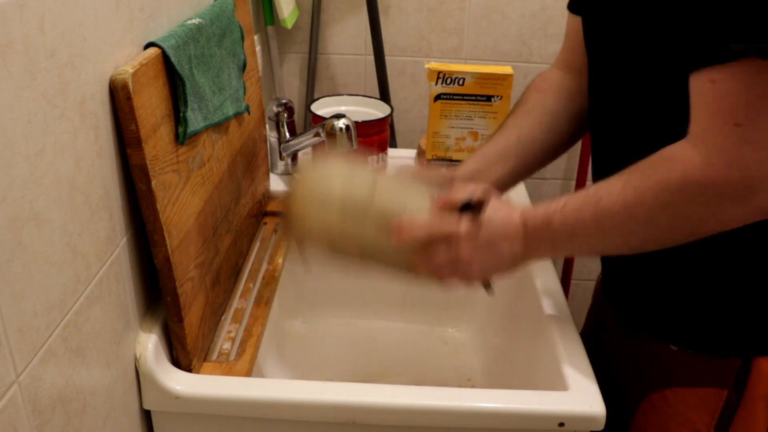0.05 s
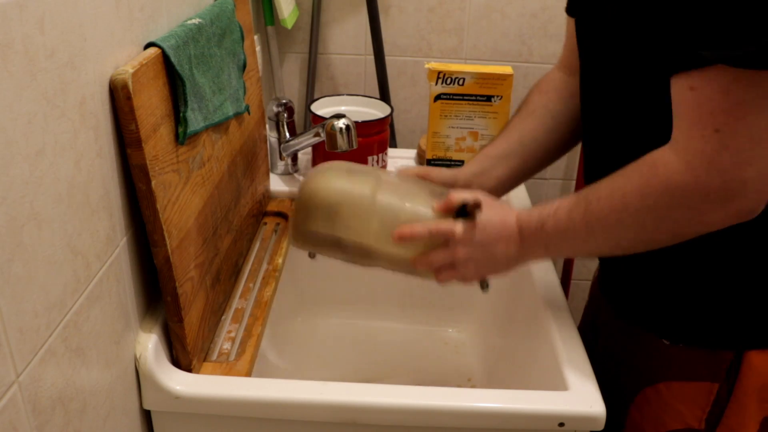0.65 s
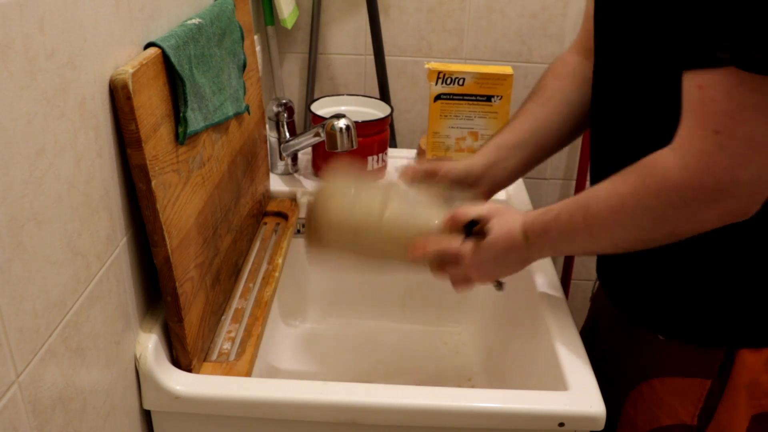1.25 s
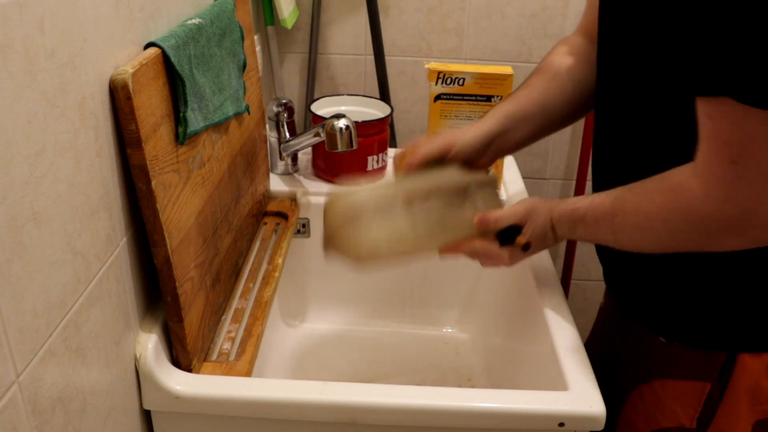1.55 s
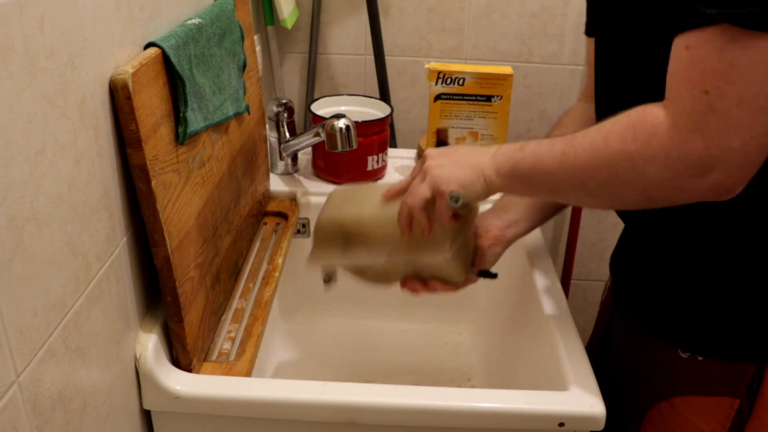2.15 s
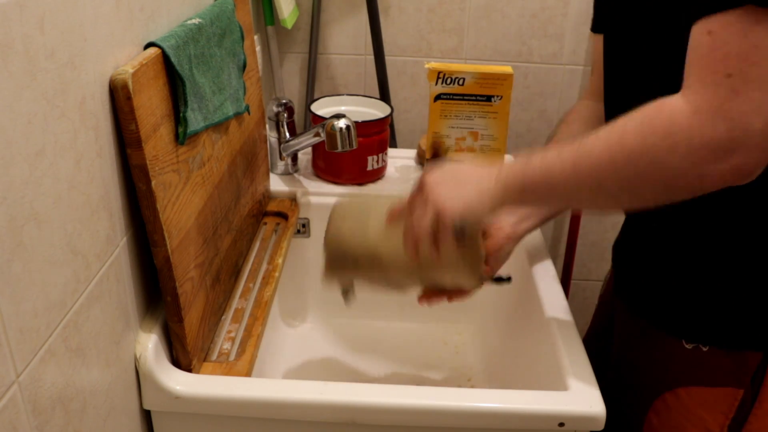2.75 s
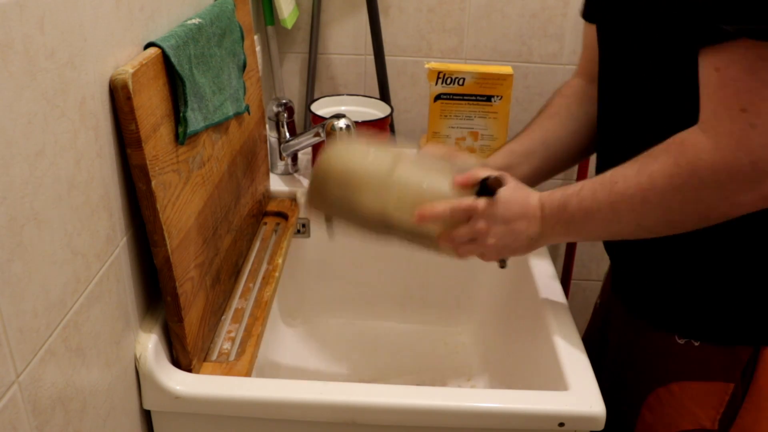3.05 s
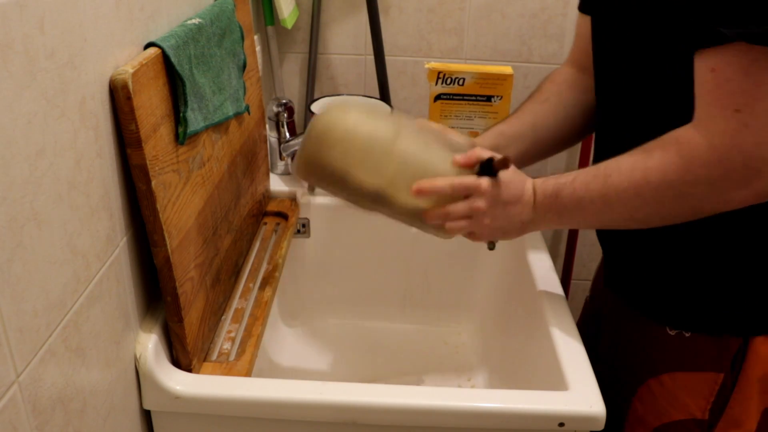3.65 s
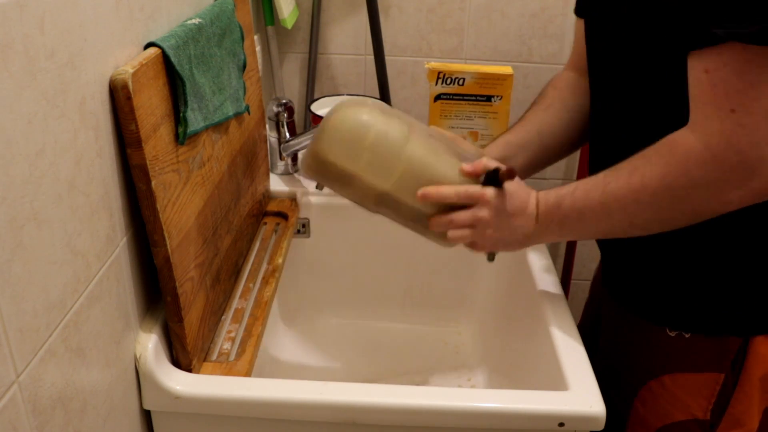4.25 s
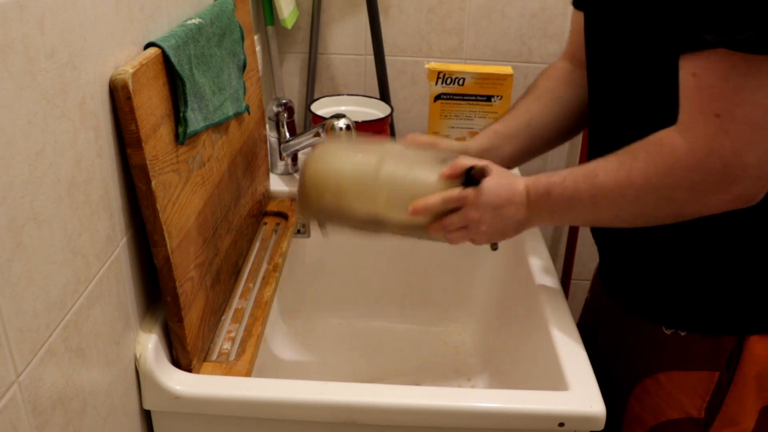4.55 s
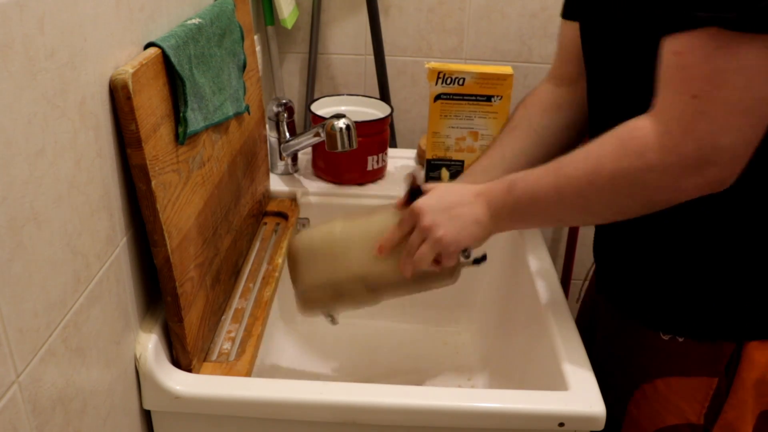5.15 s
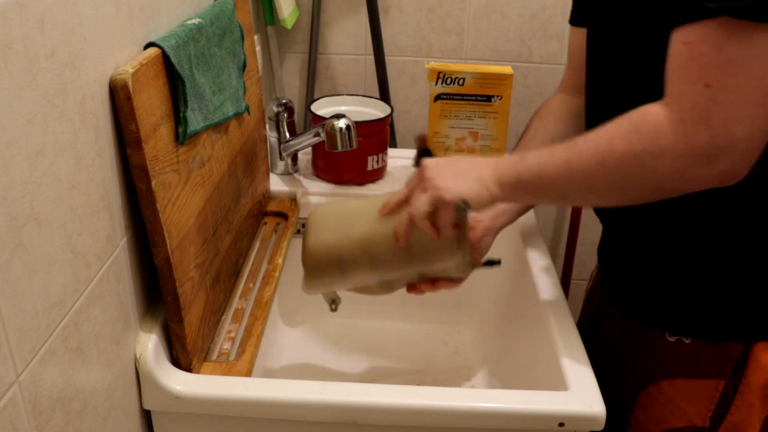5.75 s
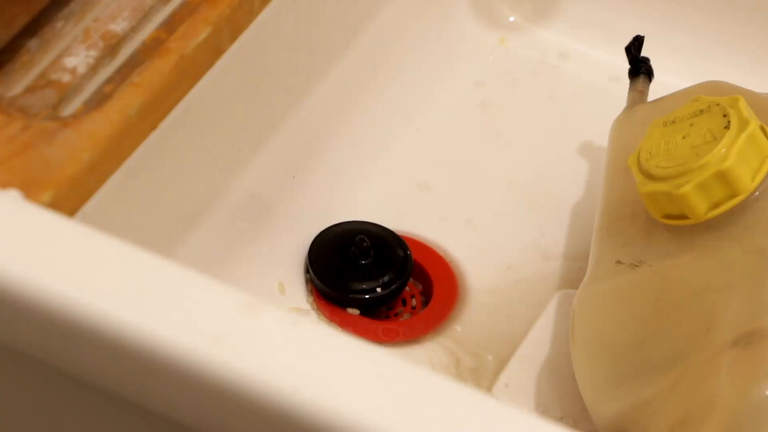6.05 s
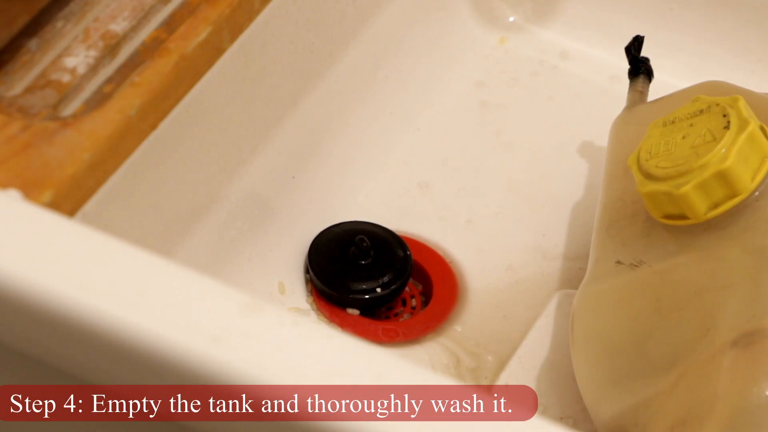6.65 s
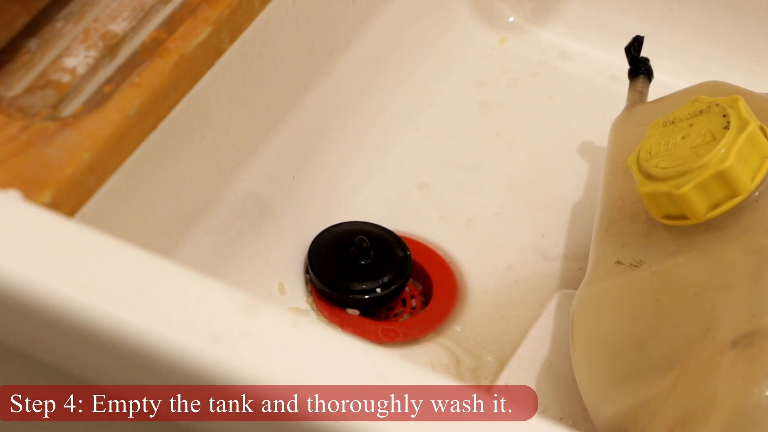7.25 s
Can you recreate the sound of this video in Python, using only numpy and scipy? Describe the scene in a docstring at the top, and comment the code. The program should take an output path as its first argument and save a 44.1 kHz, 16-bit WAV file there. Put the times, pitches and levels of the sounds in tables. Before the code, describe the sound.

Heard up close in a small tiled washroom, grains rattle back and forth inside a hand-shaken plastic tank, about twelve strokes a second, each a sharp hit with a bright, gritty spray. Occasional hollow knocks come from the hands. The rattle softens briefly midway, picks up again, and ends with a cluster of knocks and a tiny squeak. A sudden cut leaves low room tone, a few soft bumps, faint rustles and one tick.

```python
"""Loose grains are shaken in a plastic tank over a sink, twelve strokes a second, hitting each end in turn.
Every landing is a short slam, then a spray of tiny impacts that rings the walls. Hands knock on the plastic
along the way and squeak once near the last strokes. At six seconds the scene changes to quiet washroom tone
with soft handling bumps, a low rumble, rustles and one faint tick."""
import sys
import numpy as np
from scipy import signal
from scipy.fft import rfft, irfft
from scipy.io import wavfile
from scipy.ndimage import uniform_filter1d

SR = 44100
rng = np.random.default_rng(int(sys.argv[2]) if len(sys.argv) > 2 else 0)


def waveform_to_disk(signal):
    """Save audio, clipped to [-1, 1], as 16-bit WAV at the path in sys.argv[1]."""
    frames = np.transpose(np.atleast_2d(signal))
    scaled = np.clip(frames, -1, 1) * 32767
    samples = np.round(scaled).astype(np.int16)
    wavfile.write(sys.argv[1], SR, samples)


N = 330750

# EQ curves of the room tone and the handling noises: (frequency [Hz], relative level [dB])
ROOM_EQ = [(30, -16), (70, -18.5), (170, -9), (320, 1), (450, -2.5), (620, -5), (790, -8.5), (1200, -12),
           (3000, -20.5)]
RUMBLE_EQ = [(25, -21), (50, -18), (72, 5), (90, -10), (140, 2.5), (400, -35.5)]
RUB_EQ = [(200, -26), (600, 2), (1200, 0), (2200, 0), (3500, -4), (5500, -16), (16000, -33)]
HISS_EQ = [(200, -47), (1500, -8), (4500, -3), (7000, 1.5), (10000, -0.5), (15500, -10.5)]
# faint note in the room tone: (frequency [Hz], width [Hz], boost [dB])
ROOM_RINGS = [(970, 74, 10.5)]
# low swells under the handling: (peak time [s], length [s], level [dB])
RUMBLES = [(6.17, 0.33, -64), (6.6, 0.27, -52.5)]
# faint rustles: (peak time [s], length [s], dull rub [dB], bright hiss [dB])
RUSTLES = [(6.085, 0.023, -66, -56.5), (6.53, .2, -58.5, -65), (7.05, 0.091, -58, -68),
           (7.16, .07, -61.5, -60), (7.38, 0.13, -57.5, -55)]
# soft bumps, a light touch, hands on the tank: (time [s], level [dB], centre [Hz], spread [octaves])
BUMPS = [(6.076, -44, 173, .75), (6.168, -57, 220, .69), (6.215, -50, 246, 0.42), (6.405, -38.5, 202, .5),
         (6.428, -40.5, 270, .9), (6.446, -34, 280, 1), (6.461, -44, 230, 1.2)]
TICKS = [(7.039, -58.5, 2110, 1.0)]
KNOCKS = [(.689, -27, 1170, 0.33), (.706, -47, 167, 0.58), (.965, -34.5, 893, .1),
          (1.085, -35.5, 525, 0.64), (1.103, -36.5, 1200, 0.61), (1.472, -40.5, 536, 0.31),
          (1.589, -38, 396, 1.4), (1.76, -48.5, 150, 0.85), (1.781, -50, 380, .96),
          (1.946, -43.5, 400, 1.3), (3.297, -41, 1040, 0.042), (4.15, -48.5, 310, .7),
          (4.293, -36.5, 495, 1.35), (4.962, -37, 464, 0.78), (5.006, -36, 550, 0.71),
          (5.736, -33, 423, 0.37), (5.749, -31.5, 1610, 0.18), (5.753, -34.5, 265, 0.89),
          (5.797, -33.5, 352, 0.42), (5.807, -26, 453, 1.13), (5.829, -32, 328, 0.68),
          (5.911, -16.5, 1150, 1.62), (5.922, -21.5, 1130, 1.05), (5.928, -28.5, 320, 0.49)]
# body of the bumps and of the struck tank: (frequency [Hz], relative level [dB], t60 [s])
BUMP_MODES = [(76, -16, 0.26), (104, -22, .1), (135, -5, 0.16), (186.7, 0.5, 0.17), (208, -6, 0.11),
              (258, -4.5, 0.17), (310, -7.5, 0.35), (368, -3, .1), (460, -6.5, 0.34), (520, -5, 0.14)]
TANK_MODES = [(135, -19, 0.063), (186, -8, 0.048), (236, -15.5, 0.18), (317.7, -7, 0.27), (350, 3.5, 0.097),
              (400, -2, 0.15), (455, 8, 0.048), (637, -1.5, 0.11), (820, 11, 0.037), (909, 1, 0.2),
              (1056, -2, 0.22), (1120, -3, 0.29), (1244, 22.5, 0.031), (1418, -3, 0.18), (1660, -10, 0.038),
              (1820, -2, 0.11), (2130, 8.5, 0.059), (2640, 5, 0.048), (3200, 1, 0.031)]
# harmonics of the squeak, fundamental first: (relative level [dB])
SQUEAK_HARMONICS = [3, -1, -8, -27]

# EQ curves of the slam, the spray and the ringing walls: (frequency [Hz], relative level [dB])
SLAM_EQ = [(400, -23), (1500, -12), (3700, -17), (5200, 0), (8000, 0), (12000, -2.5), (15500, 1.5)]
SPRAY_EQ = [(300, -40.5), (800, -9.5), (1600, -9), (2300, -2), (3800, -2), (5500, 1), (7500, 1),
            (11000, -1.5), (15500, -5.5)]
WALL_EQ = [(60, -26), (150, -56), (300, -9.5), (500, -9), (700, 1.5), (1000, -4), (1300, -3), (1650, -27),
           (3000, -19), (8000, -37)]
# extra EQ for the softer, duller near end: (frequency [Hz], relative level [dB])
NEAR_END_EQ = [(1500, 4), (3500, 7), (5300, 3.5), (6800, 1), (10000, 1.5)]
# narrow tank resonances and notches in the spray and walls: (frequency [Hz], width [Hz], gain [dB])
SPRAY_RINGS = [(1902, 36, 6.5), (2440, 40, -1.5), (3030, 70, 6.5), (3300, 130, 0), (4520, 31, -1),
               (4670, 30, 6), (6440, 49, 2.5)]
WALL_RINGS = [(477, 31, 8.5), (698, 130, 3), (790, 14, -18), (926, 43, 10.5), (1049, 42, 14),
              (1270, 20, 10), (1480, 12, -5)]
# tempo of the shaking, even between points: (time [s], strokes done [count])
PACE = [(.009, 0), (.093, 1), (.368, 4), (.444, 5), (.713, 8), (1.376, 16), (1.636, 19), (2.461, 29),
        (3.293, 39), (3.81, 45), (4.235, 50), (4.47, 53), (4.541, 54), (5.184, 62), (5.778, 69),
        (5.966, 71)]
# how hard the arms shake: (time [s], effort [dB])
EFFORT = [(0, -2.5), (.17, 1), (.3, -1.5), (.7, 0.5), (.95, 1.5), (1.45, 0.5), (1.75, -1), (2.05, -0.5),
          (2.2, -3), (2.55, -4), (2.84, -5.5), (3.0, 0.45), (3.7, -0.5), (4.5, .7), (4.7, -0.5), (4.9, .5),
          (5.5, -1), (5.9, -4.5)]
# tank's aim along the stroke, 0 is head on; turned aside, grains slide more: (time [s], aim [dB])
AIM = [(0, -6), (1.1, -1.5), (1.9, -5), (2.35, -12), (2.7, -9.5), (2.86, -2), (3.05, -1.5), (3.5, -2.5),
       (4.15, 0), (4.4, -1), (5.55, -1.5), (5.9, -7.5)]
# extra-hard slam accents, including a sharp click at the very start: (time [s], extra slam [dB])
SLAM_ACCENTS = [(.009, 8), (.186, 9), (.444, 4), (1.636, 5.5), (1.967, 6.5), (3.046, 4.5), (3.128, 3),
                (3.211, 5), (3.978, 2), (4.151, 3), (4.393, 3.5), (4.622, 3.5), (4.865, 2), (5.185, 5),
                (5.608, 7.5)]

# landing mix at normal effort, head on, and what moves it: (slam, spray, wall ring)
FAR_LANDING_DB, NEAR_LANDING_DB = (-24.5, -27.5, -42), (-28, -32.5, -45)
PER_EFFORT, PER_AIM = (1, 0.92, 1.5), (1, 0, .2)  # dB per dB
LANDING_SCATTER_DB = (1.98, 0.76, 1.75)
CUT_S = 6.023


def undb(db):
    """Decibels to gain."""
    return 10 ** (np.asarray(db) / 20)


def unit(x):
    """Scale to an rms of 1."""
    return x / np.sqrt(np.mean(x ** 2))


def at(curve, times):
    """Read an automation curve at the given times."""
    return np.interp(times, *np.transpose(curve))


def add(track, time_s, sound):
    """Mix a sound into a track at a time."""
    start = max(int(time_s * SR), 0)
    track[start:start + len(sound)] += sound[:max(N - start, 0)]


def high_pass(x, hz):
    """Thin the lows: small bodies radiate little below their own range."""
    return signal.sosfilt(signal.butter(3, hz, "high", fs=SR, output="sos"), x)


def colour(x, eq, rings=(), size=8192):
    """Minimum-phase EQ of unit power: a broad curve with narrow resonances on top."""
    f = np.maximum(np.arange(size // 2 + 1) * SR / size, 1)
    hz, db = np.array(eq, float).T
    db = np.interp(np.log(f), np.log(hz), db)
    for centre, width, peak_db in rings:
        db = db + peak_db / (1 + (2 * (f - centre) / width) ** 2)
    cepstrum = irfft(np.log(undb(db)))
    cepstrum[1:size // 2] *= 2  # fold forward, so nothing rings ahead of a hit
    cepstrum[size // 2 + 1:] = 0
    response = irfft(np.exp(rfft(cepstrum)))
    return signal.fftconvolve(x, response / np.linalg.norm(response))[:N]


def swells(rows, column, rest_db):
    """Power envelope of bell-shaped swells over a steady floor."""
    t = np.arange(N) / SR
    bells = (undb(2 * row[column]) * np.exp(-(2 * (t - row[0]) / row[1]) ** 2) for row in rows)
    return undb(2 * rest_db) + sum(bells)


def bursts(times, levels_db, rise, hold, t60):
    """Power envelope of hits, each with an attack, hold and decay in seconds."""
    t = np.arange(SR // 3) / SR
    shape = (1 - np.exp(-t / rise)) * undb(-60 * np.maximum(t - hold, 0) / t60)
    power = np.zeros(N)
    for time_s, db in zip(times, levels_db):
        add(power, time_s, (undb(db) * shape) ** 2)
    return power


def impacts(power, per_s, scatter_db):
    """A crackle of tiny hits; more power makes them both denser and harder."""
    chance = np.clip(per_s / SR * np.sqrt(power / power.mean()), 1e-4, 1)
    sizes = unit(rng.choice([-1, 1], N) * undb(scatter_db * np.clip(rng.standard_normal(N), -2, 2)))
    return (rng.random(N) < chance) * sizes * np.sqrt(power / chance)


def strikes(rows, modes, contact_s, scuff_db, scuff_t60):
    """Blows on one body; each contact spot favours the modes round one pitch and scuffs in that range."""
    t = np.arange(SR // 2) / SR
    f = np.maximum(np.fft.rfftfreq(len(t), 1 / SR), 1)
    hz, mode_db, t60 = np.array(modes, float).T[:, :, None]
    track = np.zeros(N)
    for time_s, db, centre, spread in rows:
        def favour(at_hz):
            return 1 / (1 + (np.log2(at_hz / centre) / spread) ** 4)
        detune, phase = rng.standard_normal((2, len(hz), 1))
        partials = np.sin(2 * np.pi * (hz * (1 + 0.011 * detune) * t + phase))
        ring = np.sum(favour(hz) * undb(mode_db - 60 * t / t60) * partials, axis=0)
        ring /= np.sqrt(np.mean(ring[:SR // 100] ** 2))
        noise = unit(irfft(rfft(rng.standard_normal(len(t))) * favour(f) / np.sqrt(f)))
        scuff = noise * undb(scuff_db - 60 * t / scuff_t60)
        add(track, time_s, undb(db) * (ring + scuff) * (1 - np.exp(-t / contact_s)))
    return track


def room_tone():
    """The washroom's bed: dark, steady noise that sings faintly."""
    return colour(rng.standard_normal(N), ROOM_EQ, ROOM_RINGS)


def tile_reverb(x, t60, wet_db, predelay_s):
    """Blend in a dense tail of reflections from the sink and tiles."""
    t = np.arange(SR // 2) / SR
    tail = rng.standard_normal(len(t)) * undb(-60 * t / t60) * (t > predelay_s)
    wet = signal.fftconvolve(x, tail / np.linalg.norm(tail))[:N]
    return (x + undb(wet_db) * wet) / np.sqrt(1 + undb(2 * wet_db))


def handling():
    """Quiet foley: soft bumps, a low rumble, the fine friction of rustles and the tick of a touch."""
    bumps = strikes(BUMPS, BUMP_MODES, contact_s=0.00091, scuff_db=-21, scuff_t60=0.075)
    rumble_power = swells(RUMBLES, column=2, rest_db=-71.5)
    rumble = colour(rng.standard_normal(N), RUMBLE_EQ) * np.sqrt(rumble_power)
    rub = impacts(swells(RUSTLES, column=2, rest_db=-63), per_s=4000, scatter_db=2)
    hiss = impacts(swells(RUSTLES, column=3, rest_db=-67), per_s=22000, scatter_db=6)
    tick = strikes(TICKS, TANK_MODES, contact_s=.0004, scuff_db=9, scuff_t60=0.059)
    return bumps + rumble + colour(rub, RUB_EQ) + colour(hiss, HISS_EQ) + tick


def hand_knocks():
    """The tank knocks in the hands and its plastic body rings."""
    return strikes(KNOCKS, TANK_MODES, contact_s=0.0013, scuff_db=-5, scuff_t60=0.1)


def hand_squeak(peak_s=5.853, length_s=0.026, level_db=-18.5, pitch_hz=751, rise_hz_per_s=1400):
    """Skin sticks and slips on the tank: a brief rising chirp with a rough pitch."""
    t = np.arange(N) / SR - peak_s
    wobble = unit(uniform_filter1d(rng.standard_normal(N), size=60))
    hz = pitch_hz + rise_hz_per_s * np.clip(t, -length_s, length_s)
    phase = 2 * np.pi * np.cumsum(hz * (1 + 0.051 * wobble)) / SR
    tone = sum(undb(db) * np.sin(k * phase) for k, db in enumerate(SQUEAK_HARMONICS, 1))
    envelope = np.exp(-2 * abs(t) / length_s) * (abs(t) < 2 * length_s)
    return unit(tone) * undb(level_db) * envelope


def grain_slide():
    """Grains skid along the side wall, louder the further the tank is turned aside."""
    level_db = -50.5 - 0.98 * at(AIM, np.arange(N) / SR)
    return colour(impacts(undb(2 * level_db), per_s=6000, scatter_db=1.5), SPRAY_EQ, SPRAY_RINGS)


def shimmer(x, depth_db, per_s, bands=18):
    """The grains land somewhere else each time, so every band swells and dips by itself."""
    spectrum = rfft(x)
    log_hz = np.log(np.arange(len(spectrum)) * SR / N + 1)
    band_position = np.interp(log_hz, np.log([500, 16000]), [0, bands - 1])
    t = np.arange(N) / SR
    out = np.zeros(N)
    for k in range(bands):
        band = irfft(spectrum * np.maximum(1 - abs(band_position - k), 0), N)
        knots = rng.standard_normal(N // 1000)
        drift = np.interp(t * per_s, np.arange(len(knots)), knots)
        out += band * undb(depth_db * drift)
    return out


def wall_pings(times, levels_db, centre_hz, t60, contact_s=0.0036):
    """Each slam pings the end wall, at a pitch that varies with the spot where it lands."""
    t = np.arange(SR // 25) / SR
    track = np.zeros(N)
    for time_s, db in zip(times, levels_db):
        hz = centre_hz * (1 + 0.11 * rng.uniform(-1, 1))
        push = rng.standard_normal(len(t)) * t * np.exp(-t / contact_s)
        mode = np.cos(2 * np.pi * hz * t) * undb(-60 * t / t60)
        ring = signal.fftconvolve(push, mode)[:len(t)]
        add(track, time_s, undb(db) * ring / np.sqrt(np.mean(ring[:SR // 160] ** 2)))
    return high_pass(track, 2050)


def landing_levels(times, mix_db):
    """Slam, spray and wall levels: harder, squarer strokes hit louder, and no two are alike."""
    db = np.array(mix_db) + np.outer(at(EFFORT, times), PER_EFFORT) + np.outer(at(AIM, times), PER_AIM)
    db += rng.standard_normal(db.shape) * LANDING_SCATTER_DB
    for accent_s, extra_db in SLAM_ACCENTS:
        db[abs(times - accent_s) < .012, 0] += extra_db
    return db.T


def grain_landings(times, mix_db, ping_hz, ping_t60, ping_db):
    """The packed front slams into an end wall, stragglers spray after it, and the wall rings below."""
    slam_db, spray_db, wall_db = landing_levels(times, mix_db)
    slam = impacts(bursts(times, slam_db, rise=.0004, hold=.002, t60=.022), per_s=2300, scatter_db=3.5)
    spray = impacts(bursts(times, spray_db, rise=.0013, hold=.019, t60=.13), per_s=4000, scatter_db=0)
    wall = impacts(bursts(times, wall_db, rise=.0009, hold=.014, t60=.072), per_s=900, scatter_db=2.5)
    ping = wall_pings(times, slam_db + ping_db + at(AIM, times), ping_hz, ping_t60)
    attack = colour(slam, SLAM_EQ) + ping
    return attack + colour(spray, SPRAY_EQ, SPRAY_RINGS) + colour(wall, WALL_EQ, WALL_RINGS)


def shaken_grains(return_share=.605, jitter_s=.0015):
    """Each stroke throws the grains onto the far end and back onto the near one, over a bed of sliding."""
    times, strokes = np.transpose(PACE)
    far_s = np.interp(np.arange(strokes[-1] + 1), strokes, times)
    near_s = far_s[:-1] + return_share * np.diff(far_s) + jitter_s * rng.standard_normal(len(far_s) - 1)
    far_end = grain_landings(far_s, FAR_LANDING_DB, ping_hz=5450, ping_t60=0.005, ping_db=-4)
    near_end = grain_landings(near_s, NEAR_LANDING_DB, ping_hz=5130, ping_t60=0.0021, ping_db=-5.5)
    return shimmer(far_end + colour(near_end, NEAR_END_EQ) + grain_slide(), depth_db=1.64, per_s=28)


def scene():
    """The shaken tank in a small tiled room, then a hard cut to quiet handling and fuller room tone."""
    tank = high_pass(shaken_grains() + hand_knocks() + hand_squeak(), 102)
    tank = tile_reverb(tank, t60=.45, wet_db=-10, predelay_s=.005)
    foley = handling()
    room = room_tone()
    shaking = np.arange(N) / SR < CUT_S
    return np.where(shaking, tank + undb(-63) * room, foley + undb(-58.5) * room)[None]


def record(dry, top_hz=15850):
    """A steep low-pass shaves off the highest air."""
    return signal.sosfilt(signal.ellip(14, .2, 70, top_hz, fs=SR, output="sos"), dry)


dry = scene()
out = record(dry)
waveform_to_disk(out)
```